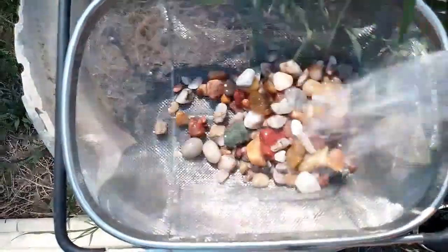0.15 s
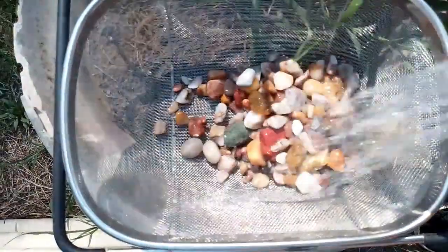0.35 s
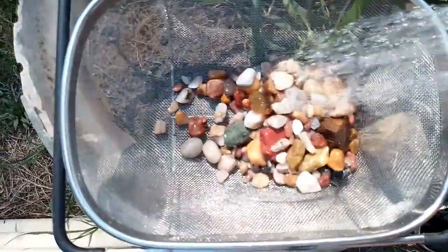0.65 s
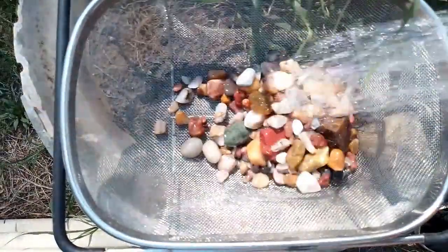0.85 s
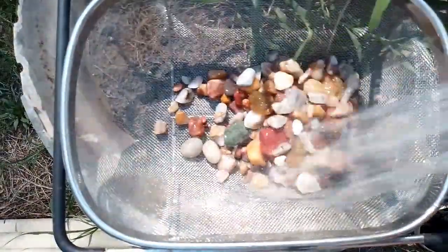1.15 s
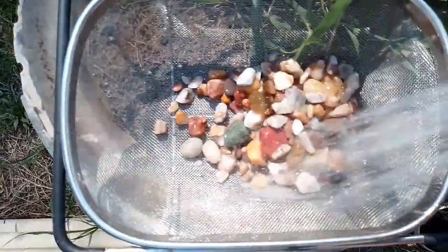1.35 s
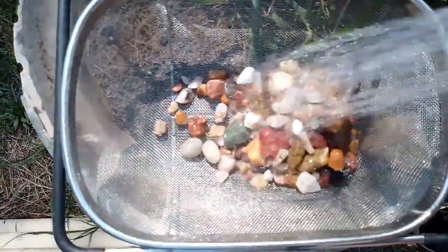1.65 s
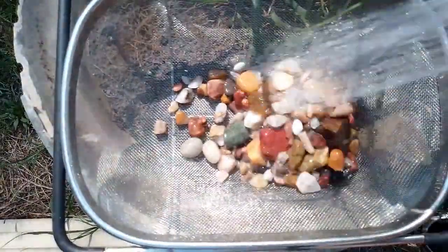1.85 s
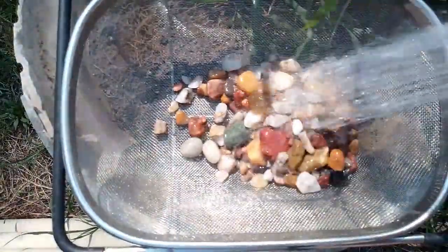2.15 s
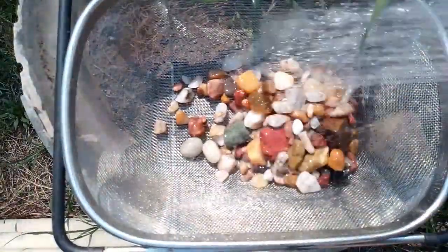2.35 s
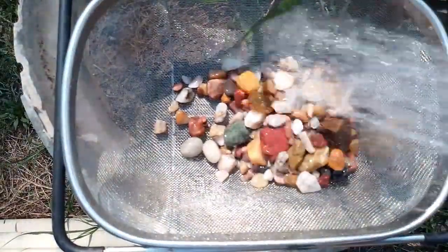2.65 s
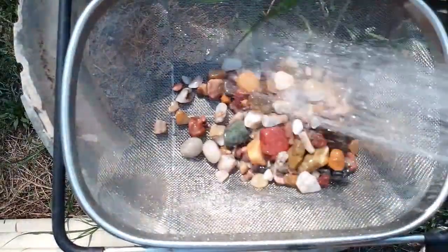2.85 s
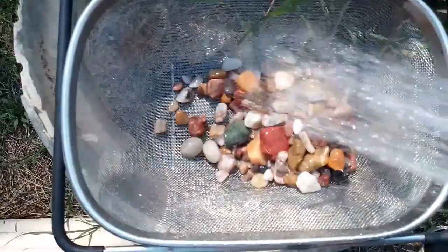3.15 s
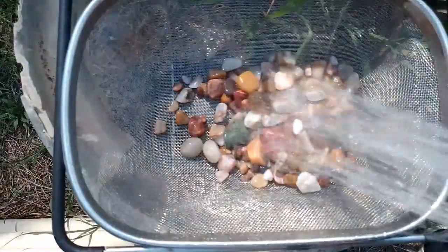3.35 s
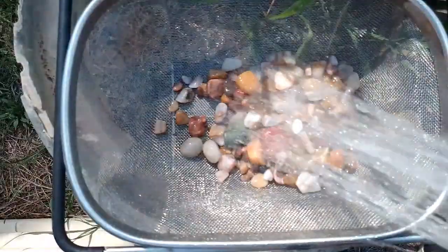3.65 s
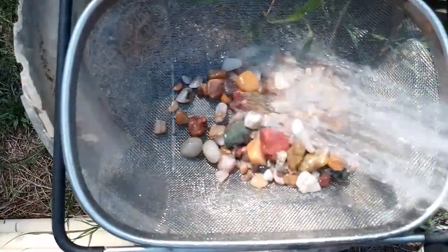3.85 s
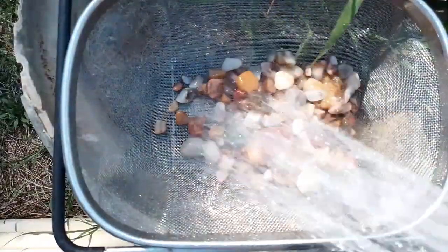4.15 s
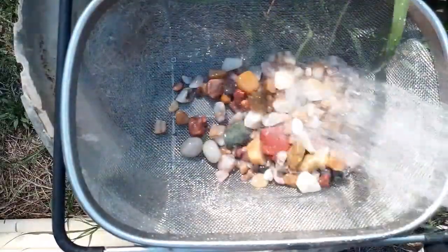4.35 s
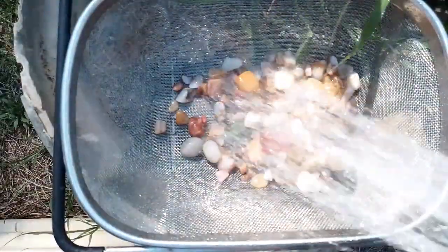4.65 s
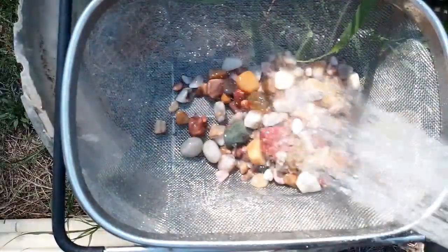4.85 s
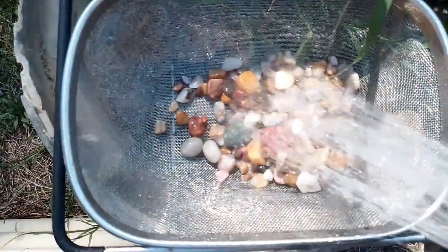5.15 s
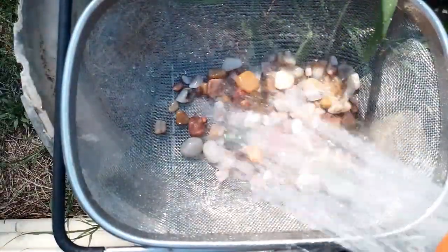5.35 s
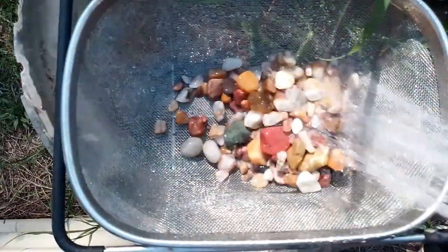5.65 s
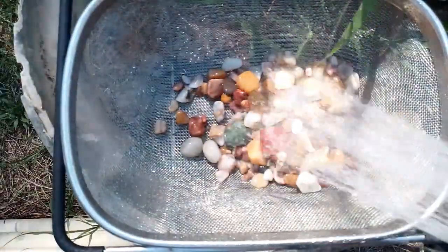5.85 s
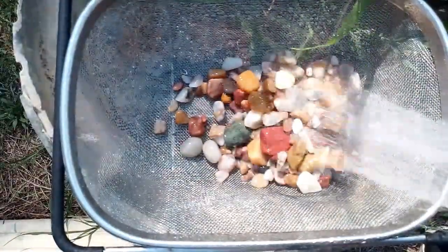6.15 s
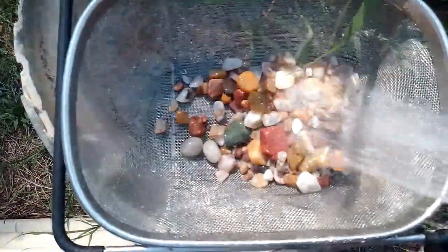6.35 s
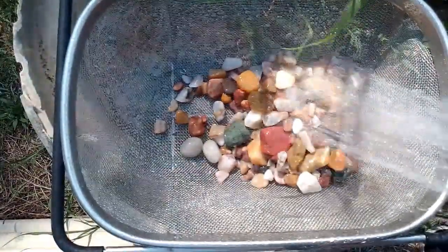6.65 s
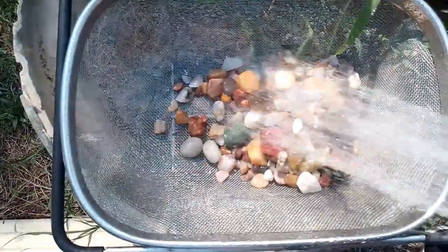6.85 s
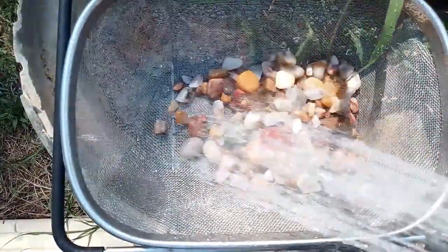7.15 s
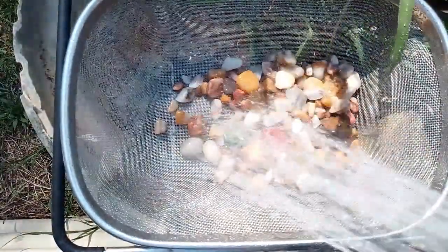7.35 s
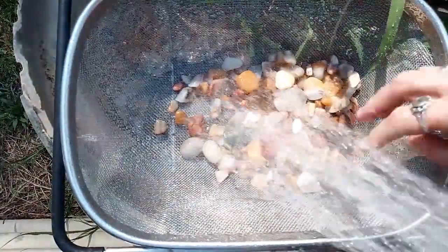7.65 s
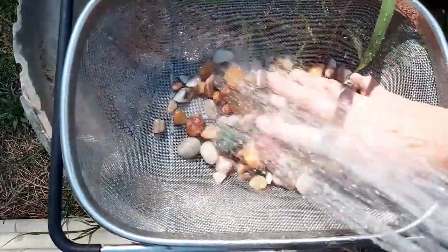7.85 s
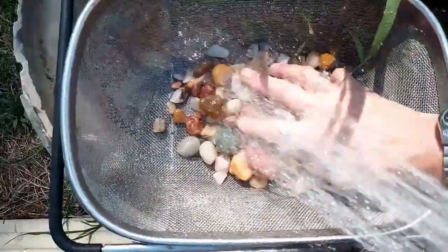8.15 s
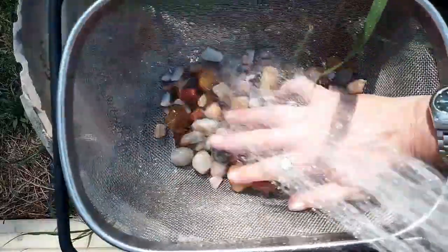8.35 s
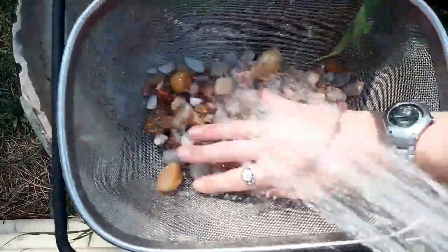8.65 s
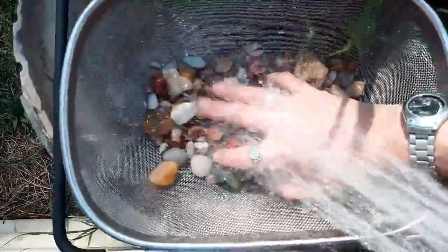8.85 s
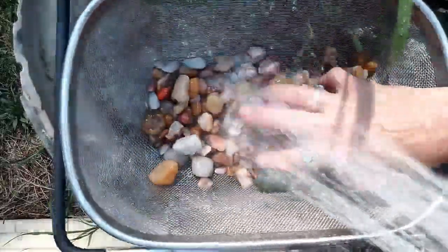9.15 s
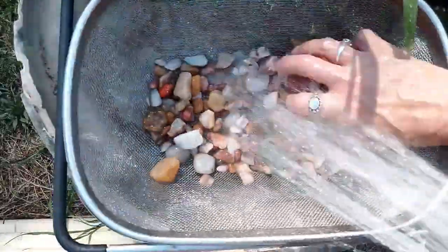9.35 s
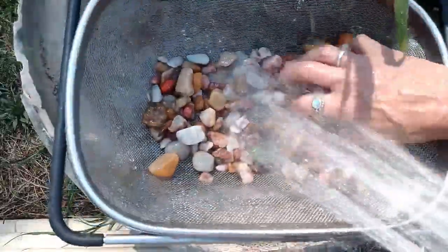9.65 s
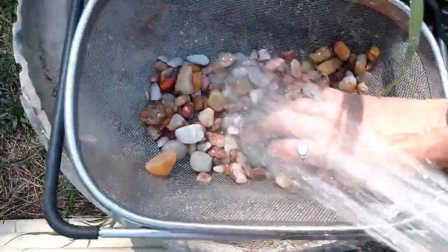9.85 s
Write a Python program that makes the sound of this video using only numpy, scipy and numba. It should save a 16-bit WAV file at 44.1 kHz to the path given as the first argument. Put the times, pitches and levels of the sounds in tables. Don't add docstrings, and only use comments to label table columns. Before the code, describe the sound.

A hose sprays pebbles in a metal mesh sieve outdoors. It begins weakly with scattered sharp drops, then becomes a loud steady sizzle with brief dips, dull draining patter and a faint whistling hiss from the nozzle. In the last quarter, quick hand strokes drag wet stones across the wire, scraping, clacking and ringing over the spray. The sound is close, mono, bright and thin in the bass, with small overload ticks.

```python
import sys
import numpy as np
from scipy import signal
from scipy.fft import rfft, irfft, next_fast_len
from scipy.io import wavfile
from scipy.ndimage import uniform_filter1d
from numba import njit

SR = 44100
rng = np.random.default_rng(int(sys.argv[2]) if len(sys.argv) > 2 else 0)


def generate_wav(sig):
    pcm = np.round(np.clip(np.atleast_2d(sig).T, -1, 1) * 32767).astype(np.int16)
    wavfile.write(sys.argv[1], SR, pcm)


def elevation(decibels):
    levels = np.asarray(decibels, float)
    return 10 ** (levels / 20)


N = 440559


def seconds():
    return np.arange(N) / SR


def steady(hz):
    return np.full(N, float(hz))


def level(x, db):
    return x * elevation(db) / np.sqrt(np.mean(x ** 2))


def columns(table, outside=-77.0):
    s, first, *rest = np.transpose(table)
    t = seconds()
    return [np.interp(t, s, first, left=outside)] + [np.interp(t, s, c) for c in rest]


def colour(x, points):
    size = next_fast_len(N)
    hz, db = np.transpose(points)
    octaves = np.log2(np.arange(size // 2 + 1) * SR / size + 1)
    below = np.maximum(np.log2(hz[0]) - octaves, 0)
    above = np.maximum(octaves - np.log2(hz[-1]), 0)
    gain = elevation(np.interp(octaves, np.log2(hz), db) - 13.6 * (below + above))
    return irfft(rfft(x, size) * gain, size)[:N]


@njit
def svf(x, hz, width):
    y, band, low = np.empty(len(x)), 0., 0.
    for i in range(len(x)):
        g, damping = np.tan(np.pi * hz[i] / SR), width / hz[i]
        v = (band + g * (x[i] - low)) / (1 + g * (g + damping))
        band, low, y[i] = 2 * v - band, low + 2 * g * v, damping * v
    return y


def resonate(x, hz, width):
    return svf(svf(x, hz, width), hz, width)


def walk(rate):
    k = max(int(SR / rate), 1)
    held = np.repeat(rng.standard_normal(N // 100)[:N // k + 1], k)
    return 1.37 * uniform_filter1d(uniform_filter1d(held, k), k)[:N]


def impacts(rate, spread_db, tail_ms):
    hit = (rng.random(N) < rate / SR) / rate
    power = hit * elevation(2 * spread_db * np.minimum(rng.exponential(size=N), 5))
    burst = signal.lfilter([1], [1, -np.exp(-1000 / (tail_ms * SR))], power)
    return level(np.sqrt(burst) * rng.standard_normal(N), 0)


def ring(s, db, hz, t60):
    out, t = np.zeros(N + 2048), np.arange(2048) / SR
    for start, gain, f in zip(s, elevation(db), hz):
        i = int(start * SR)
        out[i:i + 2048] += gain * np.sin(2 * np.pi * f * t) * np.exp(-np.log(1000) * t / t60)
    return out[:N]


def humps(s, length, edge):
    t = np.arange(0, N / SR, .001)
    return .5 ** (np.abs(2 * (t - s[:, None]) / length[:, None]) ** edge)


def per_sample(curve):
    return np.interp(seconds() * 1000, np.arange(len(curve)), curve)


# hz, level_db (per Hz)
GARDEN_TONE = [(59, -59), (100, -3.5), (466, -8.5), (840, -4), (973, -11), (1260, -5.5), (2470, -10.5),
               (5000, -4), (6500, -30), (11000, -120)]


def garden():
    return level(colour(rng.standard_normal(N), GARDEN_TONE), -52.5) * elevation(1.5 * walk(2.9))


# time_s, flow_db (on the stones), splash_db (share of duller splash), air_db (drawn into nozzle)
HOSE = [(0, -25, -13, -62), (.2, -28, -12.5, -57), (.49, -27, -10.5, -62), (.55, -21, -11.5, -51),
        (.78, -17, -10.5, -41), (1.25, -17.5, -12.5, -43.5), (1.9, -18, -11.5, -45),
        (2.2, -16.5, -10.5, -35), (2.6, -16.5, -11, -33.5), (2.9, -18, -12, -26.5), (3.5, -17, -12, -29),
        (4.6, -17.5, -11, -32), (5.4, -18, -13, -30), (6.6, -16, -14.5, -32), (6.9, -17, -14, -26.5),
        (7.5, -19, -7.5, -32), (8.5, -19.5, -9, -37.5), (9.99, -18.5, -12, -33.5)]


def hose():
    return columns(HOSE)


def weak_db():
    return np.minimum(hose()[0] + 18, 0)


# middle_s, length_s, depth_db
JET_SWINGS = [(.335, 0.052, -4.5), (0.428, 0.055, -4.5), (1.38, 0.19, -4), (1.63, 0.1, -3.5),
              (2.065, 0.082, -2.5), (2.296, 0.16, -1.5), (2.67, 0.083, -1.5), (3.124, 0.18, -3.5),
              (3.95, 0.084, -2.5), (4.206, 0.12, -3), (5.977, 0.18, -1.5), (7.217, 0.1, -2.5),
              (7.38, 0.044, -1), (7.605, 0.14, -2.5), (7.776, .04, -2.4), (8.027, 0.14, -2),
              (8.363, 0.022, -3), (8.466, 0.12, -3), (8.572, .05, -3), (8.753, 0.066, -3.3),
              (8.886, 0.072, -3), (9.127, .06, -4.5), (9.235, 0.034, -3.1)]


def swing_db():
    s, length, db = np.transpose(JET_SWINGS)
    return per_sample(db @ humps(s, length, edge=5.5))


# hz, level_db (per Hz)
RUNOFF_TONE = [(150, -28), (300, -16), (500, -7.5), (750, -3), (1600, -2), (2200, 1.5), (2800, -3.5),
               (3300, -8.5)]


def runoff():
    patter = impacts(rate=2700.0, spread_db=4.0, tail_ms=1.8)
    runoff_db = -48.5 + 0.61 * weak_db() + 0.89 * swing_db() + 0.34 * walk(6)
    return level(colour(patter, RUNOFF_TONE), 0) * elevation(runoff_db)


# time_s, upper_hz, lower_hz
NOZZLE_MODES = [(0, 3620, 1300), (.9, 3720, 1256), (2.2, 3570, 1230), (4, 3530, 1170), (6.6, 3550, 1190),
                (7.5, 3620, 1240), (9.99, 3580, 1190)]


def nozzle():
    upper_db, lower_db = hose()[2], -49 + 2.0 * weak_db()
    upper_hz, lower_hz = columns(NOZZLE_MODES)
    rush = impacts(rate=5000.0, spread_db=2.5, tail_ms=1.3)
    upper = resonate(rush, upper_hz, 550.0)
    upper = level(upper - svf(upper, steady(3054), 380.0), -1.4)
    upper *= elevation(upper_db + 2.0 * walk(12) + 1.0 * walk(3.1))
    lower = level(resonate(rush, lower_hz, 220.), -0.69) * elevation(lower_db + 2.0 * walk(8))
    lower *= elevation(np.interp(seconds(), [7.35, 7.5], [0, -3]))
    return (upper + lower) * elevation(1.24 * swing_db())


# start_s, peak_db, pitch_hz
PEBBLE_KNOCKS = [(7.453, -15, 3500), (7.812, -25, 2980), (8.244, -25, 1400), (8.298, -15, 3400),
                 (8.386, -23, 1650), (8.486, -17, 3490), (8.544, -26, 3190), (9.358, -19, 3040),
                 (9.418, -22, 3000), (9.441, -33, 1500), (9.731, -20, 3300), (9.838, -24, 3390),
                 (9.881, -12, 3260), (9.963, -21, 3600)]
# start_s, peak_db, pitch_hz
WIRE_PLINKS = [
    (0.183, -30, 3200),
]


def knocks():
    s, db, hz = np.transpose(PEBBLE_KNOCKS + WIRE_PLINKS)
    return ring(s, db - 3, hz, .018)


# start_s, peak_db
LONE_DROPS = [(0.0522, -10), (0.1443, -11), (0.2316, -7), (0.268, -13), (0.3074, -16), (0.36, -11),
              (0.3756, -19), (0.4025, -13), (0.4609, -8), (0.482, -8), (0.871, 0), (1.246, 1), (1.5449, -4),
              (1.9683, -12), (2.0018, -16), (5.731, -16), (6.155, -7), (6.9115, -2), (7.5655, 1),
              (7.8149, -5), (8.1, 6), (8.2453, 0), (8.3873, -1), (8.675, 3), (8.85, 6), (8.9071, -1),
              (9.1738, 6), (9.4485, -1), (9.7088, -6), (9.8396, 4)]
# start_s, tick_db, peak_db
BIG_SPLASHES = [(0.8205, -67, -10), (1.1069, -68, -7), (1.3085, -65, -5), (1.4143, -68, -3),
                (2.2256, -65, -12), (2.7311, -71, -5), (2.8688, -67, -11), (3.4763, -69, -10),
                (3.9067, -68, -7), (4.0284, -64, -9), (4.4864, -64, -11), (5.8012, -74, -4),
                (6.4929, -74, -23), (6.6198, -67, -6), (6.7171, -69, -9), (6.7693, -70, -12),
                (6.8439, -62, -8), (7.1005, -69, -11), (7.2282, -65, -13), (7.4079, -64, -6),
                (8.0741, -51, 3), (8.295, -58, 0), (8.4868, -66, 1.5), (8.624, -65, 3), (8.7729, -60, -5),
                (8.9881, -66, -3), (9.1326, -61, -4), (9.2443, -62, -8), (9.4204, -68, -1),
                (9.4682, -57, 5)]


def big_splashes():
    chance_s, size = rng.random(55) * (N - 1) / SR, rng.standard_normal(55)
    chance_db = hose()[0][(chance_s * SR).astype(int)] + 11 + 5.5 * size
    big_s, _, big_db = np.transpose(BIG_SPLASHES)
    lone_s, lone_db = np.transpose(LONE_DROPS)
    s = np.r_[big_s - .0002, lone_s, chance_s]
    db = np.r_[big_db, lone_db, chance_db] - 2
    detune = rng.standard_normal((2, len(s)))
    first = ring(s, db, 13000 + 900 * detune[0], .0022)
    second = ring(s + .00025, db - 3, 10800 + 1200 * detune[1], .003)
    return svf(first + second, steady(12000), 16000.)


def overload_ticks():
    s, tick_db, _ = np.transpose(BIG_SPLASHES)
    small = impacts(rate=150., spread_db=2.5, tail_ms=.1)
    floor = level(colour(small, [(20, -4), (60, -6), (100, 2), (140, -3), (300, -20)]), -91)
    return ring(s, tick_db + 34.5, np.full(len(s), 1200.), 0.0012) + floor


# hz, level_db (per Hz)
CRACK_TONE = [(7000, -32), (8500, -22.5), (10200, -14), (11500, -5.5), (12600, 2), (13600, -1), (14600, -3),
              (15800, -10)]
# hz, level_db (per Hz)
SPLASH_TONE = [(2400, -21), (3050, -8.5), (4000, -3.5), (4800, -4), (5500, -11), (6100, -3.5), (6650, -3),
               (7500, -1), (9000, -1.5), (11000, -3.5)]
# pitch_hz, width_hz, level_db
POCKETS = [
    (5550, 510, -12.5),
    (6670, 440, -14),
]


def spray():
    flow_db, splash_db, _ = hose()
    spray_db = flow_db + swing_db()
    jet_db = 0.5 * walk(17) + 0.66 * walk(60)
    rate = 6000 * elevation(.9 * (spray_db + 17.5))
    drops = impacts(rate=rate, spread_db=0.0, tail_ms=0.67)
    crack = level(colour(drops, CRACK_TONE), 0) * elevation(0.38 * walk(25))
    close = per_sample(humps(np.array([2.4]), np.array([0.54]), edge=3.6)[0])
    crack += 0.68 * close * svf(crack, steady(10200), 2000.)
    drops = 0.64 * drops + 0.68 * impacts(rate=0.93 * rate, spread_db=1.5, tail_ms=0.49)
    splash = level(colour(drops, SPLASH_TONE), 0.76) * elevation(0.89 * walk(10.0))
    wet_db = np.interp(seconds(), [0.86, 1.6], [-8, 1])
    for hz, width, db in POCKETS:
        centre = hz * (1 + .01 * walk(1.6))
        splash += level(svf(drops, centre, float(width)), db) * elevation(3.1 * walk(2.06) + wet_db)
    return (crack + splash * elevation(splash_db)) * elevation(spray_db + jet_db)


# time_s, lower_hz,
# lower_depth (0-1), upper_depth (0-1)
WALL_NOTCHES = [(0, 4400, 0.6, 0), (.6, 4300, 0.9, 0.1), (2.2, 4170, 0.3, 0.2), (2.6, 4970, 0.2, 0.6),
                (3.2, 4500, 0.43, 0.25), (5, 4600, 0.37, 0.4), (6.5, 5030, 0.15, 0.4),
                (7.2, 4730, 0.46, 0.5), (7.5, 4930, 0.23, 0.25), (9.99, 4900, 0.24, 0.3)]


def wall_echo(x):
    hz, depth, upper_depth = columns(WALL_NOTCHES)
    x = x - np.clip(depth, 0, 1) * svf(x, hz, 790.0)
    return x - np.clip(upper_depth, 0, 1) * svf(x, steady(7390), 570.0)


# middle_s, length_s, grit_db, tilt_db (lower wire over upper wires), rim_db (weight on the rim)
HAND_STROKES = [(7.46, 0.21, -35.5, -11, -63), (7.708, .09, -32, -4, -61), (7.795, 0.088, -39.5, 7, -61),
                (7.894, .12, -34, -5, -58), (8.063, 0.099, -38, 6, -63), (8.139, 0.076, -32.5, 11, -62),
                (8.256, 0.056, -34, 10, -66), (8.302, .05, -34, 3, -63), (8.386, .04, -37, 14, -67),
                (8.54, 0.14, -37.5, 8, -66), (8.713, 0.1, -38, 3, -64), (8.84, 0.063, -32, -7, -55),
                (8.985, .09, -31, -12, -55), (9.068, 0.046, -36.5, -14, -53),
                (9.156, 0.091, -33.5, -13, -54), (9.317, 0.13, -37, -9, -55), (9.46, 0.086, -33, -1, -53),
                (9.635, .1, -33.5, 3, -54), (9.728, 0.031, -45, 0, -50.5), (9.878, 0.1, -37.5, -1, -59)]
RESTING_HAND = -42.5, -52, -62, -70


def stroke_levels():
    s, length, grit, tilt, rim = np.transpose(HAND_STROKES)
    wire = -43.5 + 1.5 * (grit + 37)
    short, long = humps(s, length, edge=3.0), humps(s, 0.93 * length, edge=2.0)
    layers = [(grit, short), (wire + tilt / 2, short ** 1.5), (wire - tilt / 2, short ** 1.6), (rim, long)]
    levels = []
    for (db, shape), rest in zip(layers, RESTING_HAND):
        power = per_sample(elevation(2 * db) @ shape) + elevation(2 * rest)
        levels.append(10 * np.log10(power))
    return levels


# hz, level_db (per Hz)
GRIT_TONE = [(300, -37), (520, -31), (700, -6), (1200, -3.5), (2500, 3), (4500, 2.5), (8000, 1.5),
             (12000, 6.5), (15000, -25)]
# pitch_hz, width_hz, level_db
SIEVE_WIRES = [
    (1493, 460, -2.5),
    (1994, 220, -11),
    (2260, 200, -9.5),
]


def rake():
    grit_db, lower_db, upper_db, rim_db = stroke_levels()
    clicks = impacts(rate=2400.0, spread_db=2.5, tail_ms=1.0) * elevation(walk(40))
    out = elevation(grit_db) * level(colour(clicks, GRIT_TONE), 8.56)
    for (hz, width, db), mode_db in zip(SIEVE_WIRES, [lower_db, upper_db, upper_db]):
        centre = hz * (1 + 0.03 * walk(7))
        out += elevation(mode_db) * level(resonate(clicks, centre, float(width)), db)
    rim = level(resonate(clicks, steady(348), 150.0), -0.88)
    hand_down = np.interp(seconds(), [7.405, 7.415], [0, 1])
    return hand_down * (out + elevation(rim_db) * rim)


def scene():
    background = garden() + runoff() + nozzle()
    mono = background + knocks() + big_splashes() + wall_echo(spray()) + rake()
    return np.array([mono, mono])


def band_limit(x):
    return signal.sosfilt(signal.butter(12, 16690, fs=SR, output="sos"), x)


def record(dry):
    low_cut = signal.butter(4, 288, "high", fs=SR, output="sos")
    top_cut = signal.ellip(12, .2, 80, 15730, fs=SR, output="sos")
    rounded = dry / (1 + (dry / .57) ** 4) ** .25
    x = signal.sosfilt(low_cut, rounded) + overload_ticks()
    return band_limit(signal.sosfilt(top_cut, x))


dry = scene()
out = record(dry)
generate_wav(out)
```